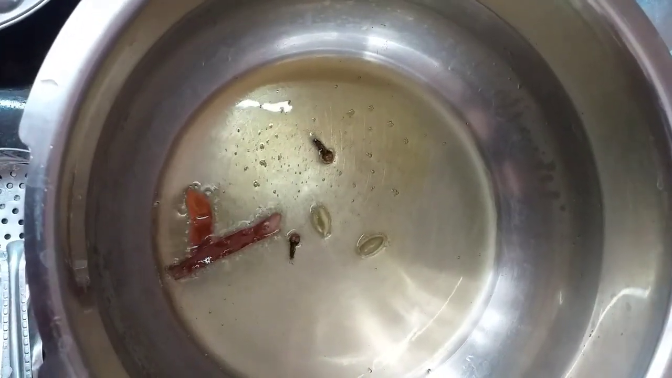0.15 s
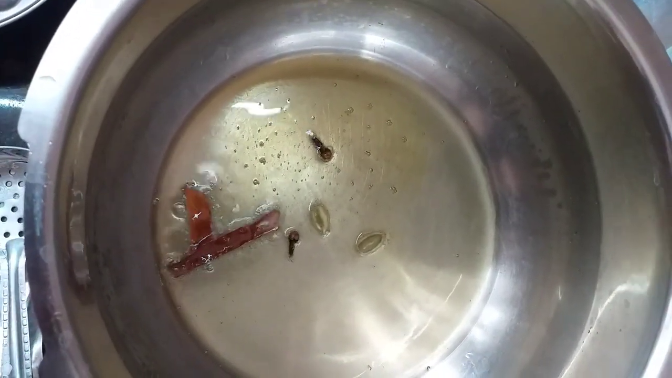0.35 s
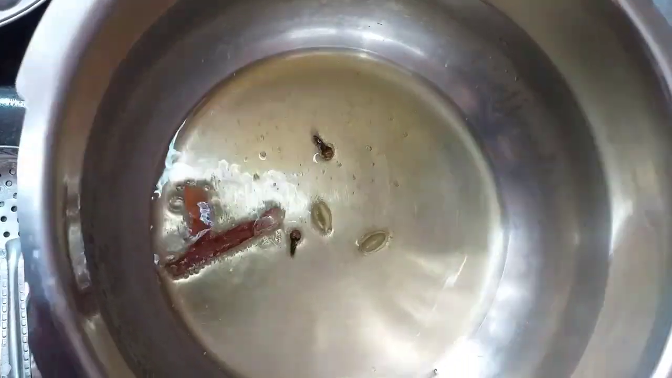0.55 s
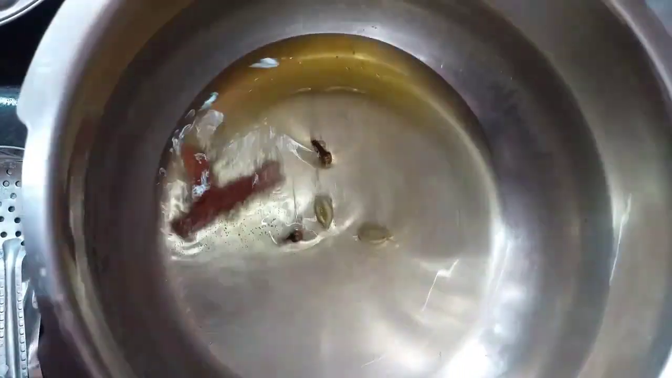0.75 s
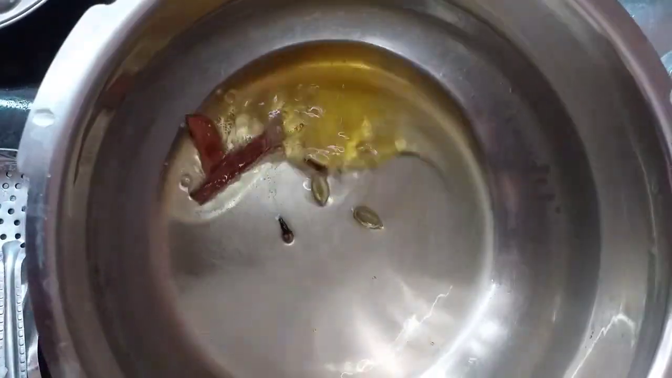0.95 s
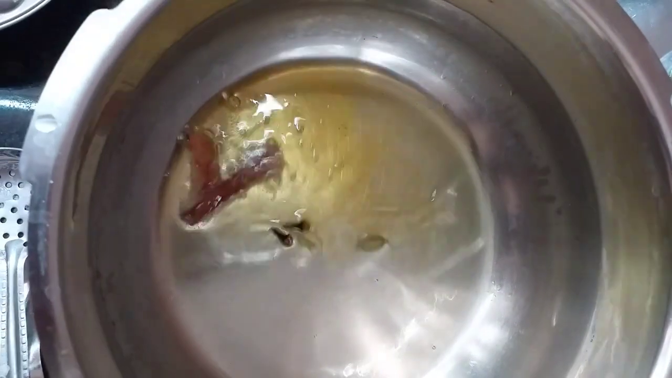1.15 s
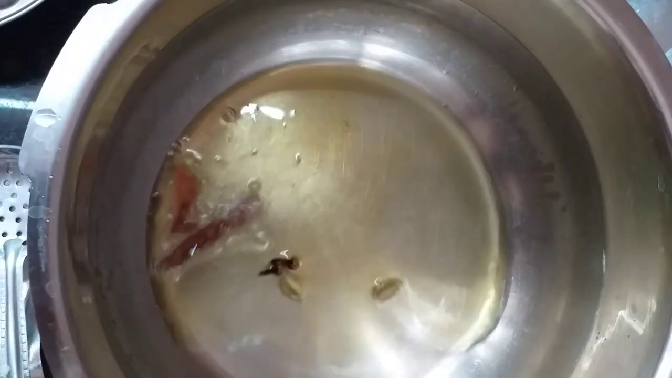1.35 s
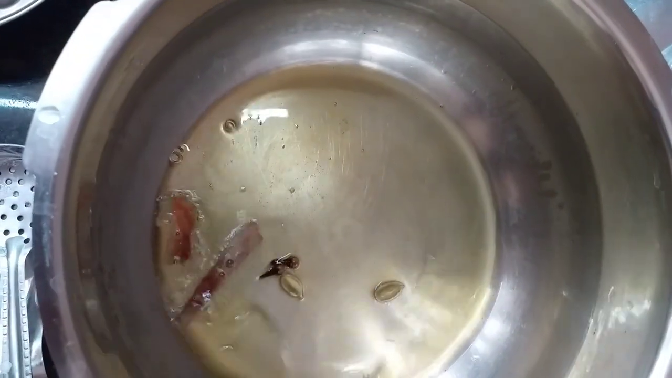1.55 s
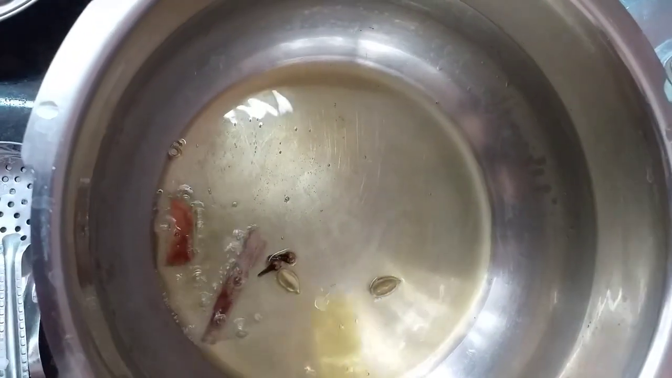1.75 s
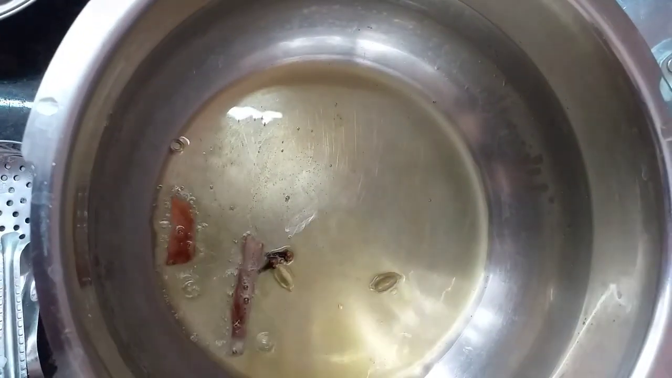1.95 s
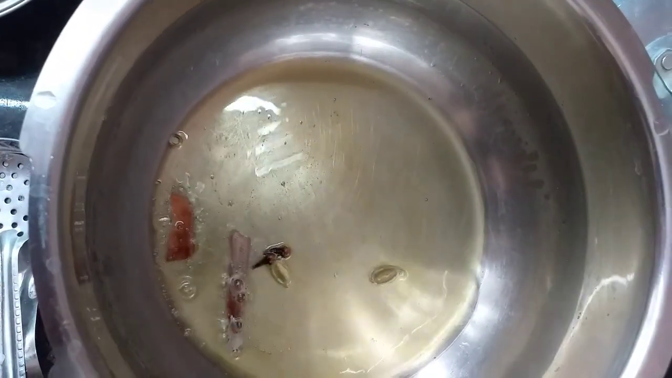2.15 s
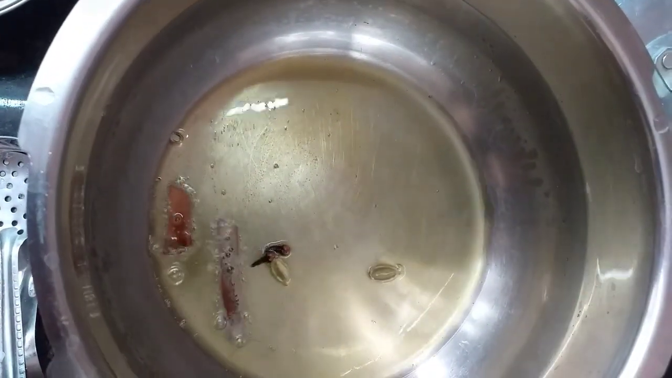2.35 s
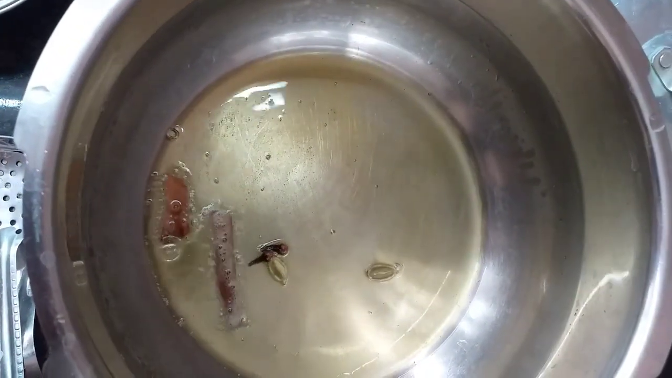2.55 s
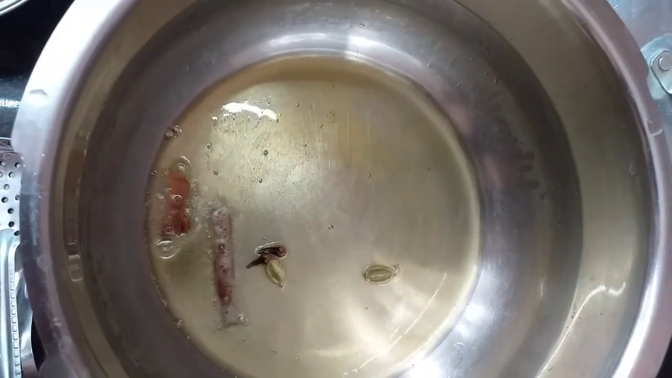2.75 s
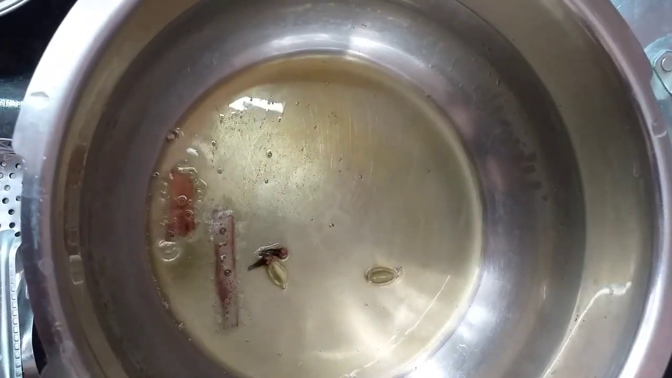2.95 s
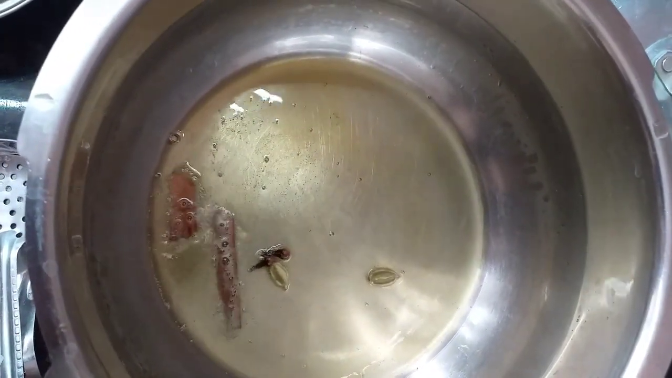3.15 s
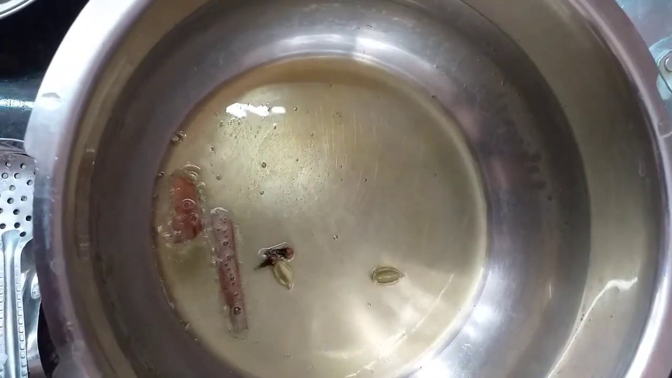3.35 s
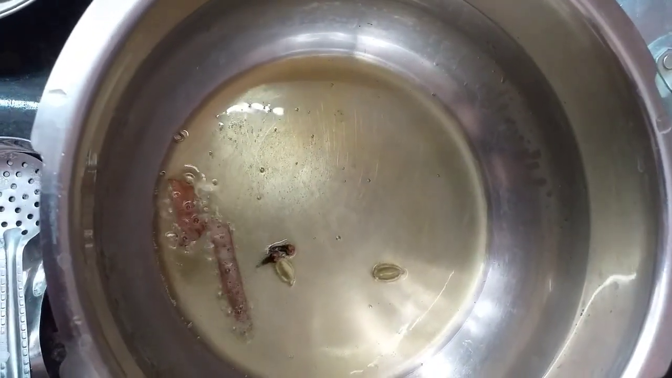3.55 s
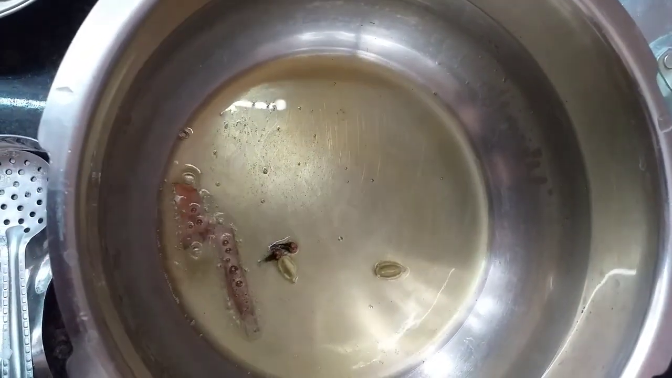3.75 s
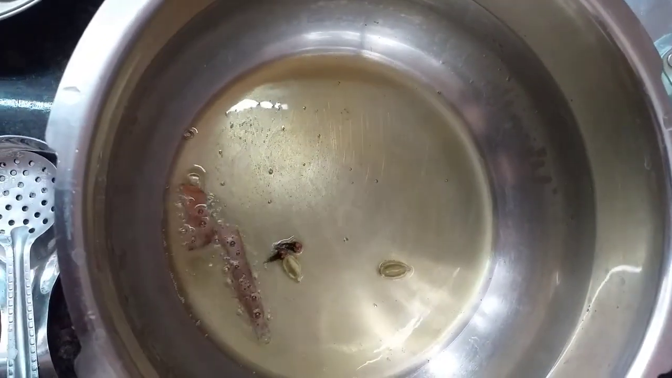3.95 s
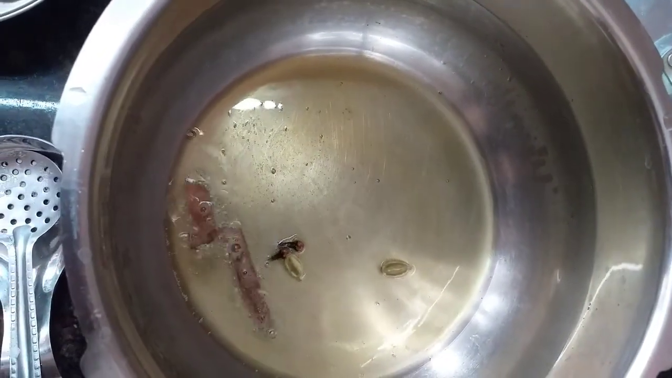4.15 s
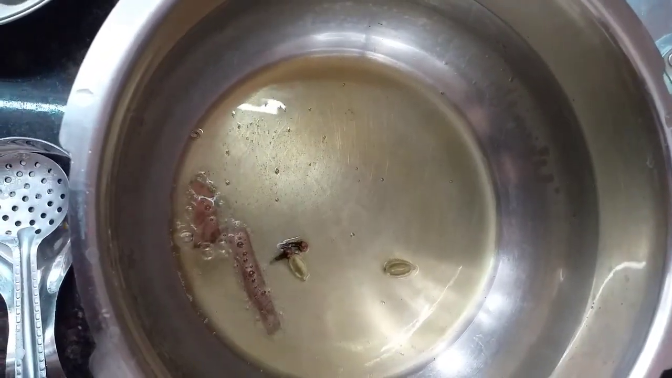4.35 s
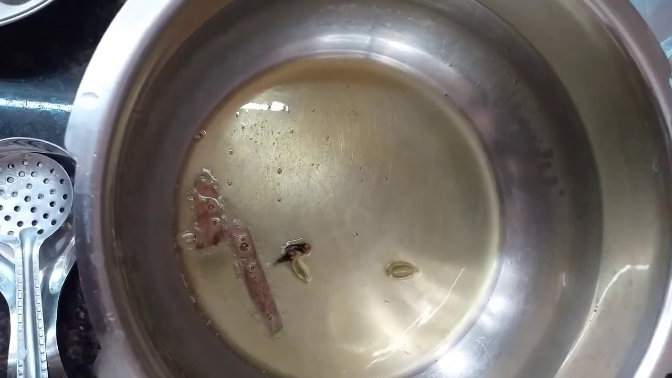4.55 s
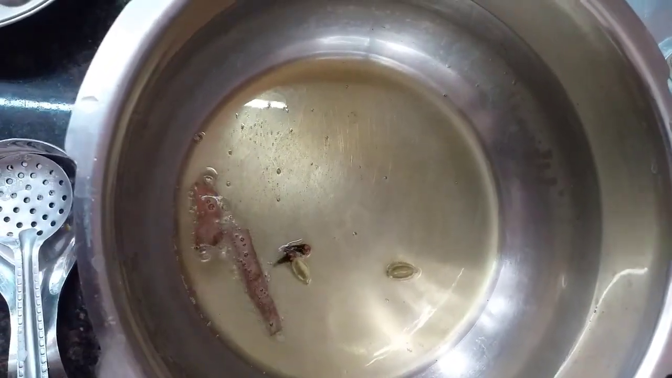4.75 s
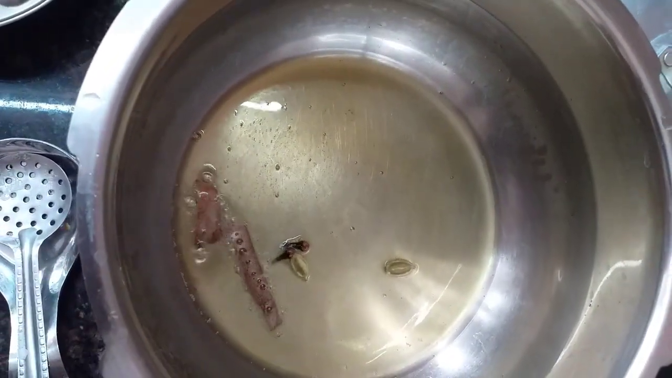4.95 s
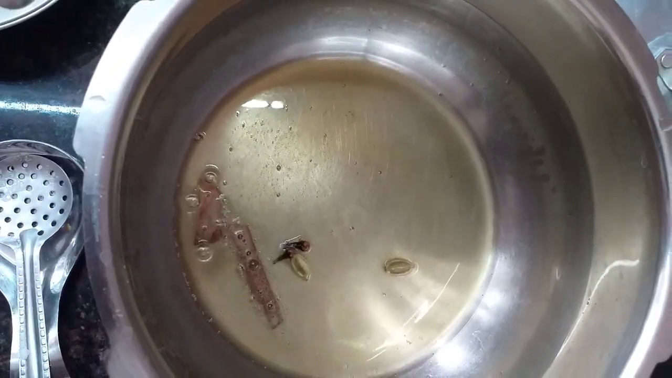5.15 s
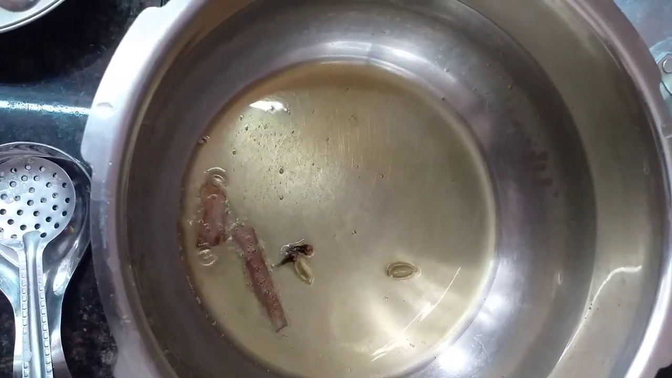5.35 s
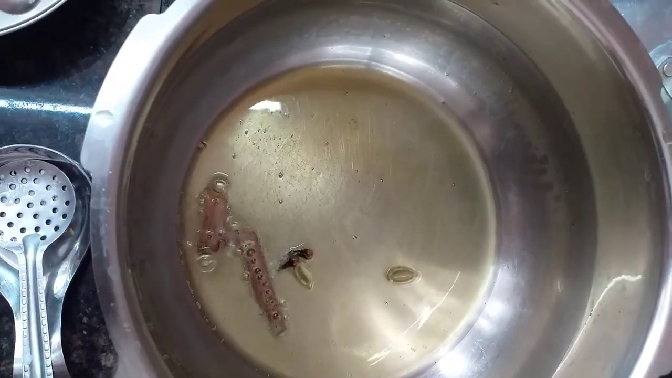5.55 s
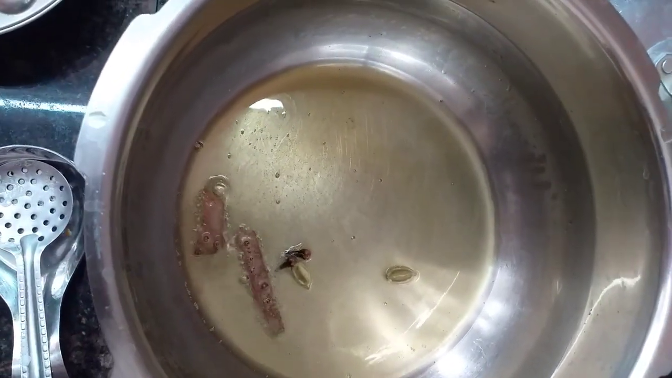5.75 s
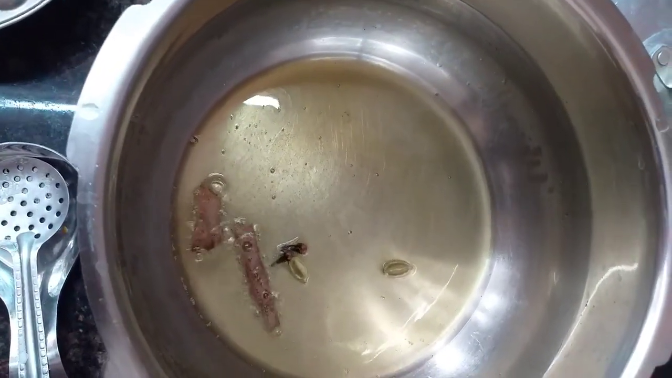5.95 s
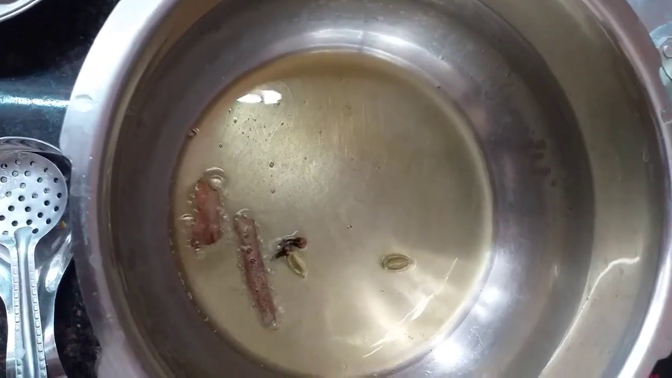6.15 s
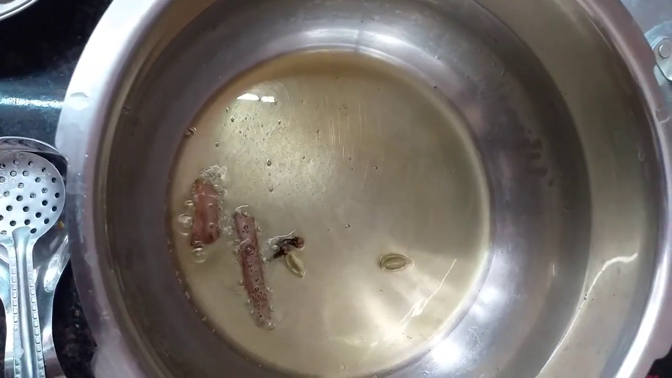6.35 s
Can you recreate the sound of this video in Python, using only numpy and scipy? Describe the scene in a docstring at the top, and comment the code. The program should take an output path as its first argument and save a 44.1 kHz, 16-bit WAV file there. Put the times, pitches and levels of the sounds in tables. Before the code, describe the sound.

Whole spices fry gently in oil in a steel pot, a fine, high sizzle dotted with sharp pops. The pot knocks and rattles on the stove's metal support, loudest about a second in, then gives a few lighter knocks and ticks. The sizzle swells slightly and scattered pops continue. A tap drips steadily throughout, over a faint gas flame hiss and low hum, heard close up in a small kitchen.

```python
"""Whole spices fry gently in oil in a steel pot in a small kitchen. From the start tiny bubbles sizzle,
spices pop and a tap drips steadily, over a gas flame's hiss, a low rumble and an appliance's hum.
The pot is tilted and knocks on its trivet, hardest near 1 s; the microphone's gain dips a moment later.
Lighter knocks and ticks follow until 3 s. The sizzle swells near 2.5 s and again near 6 s;
pops and drips go on to the end."""
import sys
import numpy as np
from scipy import signal
from scipy.fft import rfft, irfft, next_fast_len
from scipy.io import wavfile
from scipy.ndimage import uniform_filter1d

SR = 44100
rng = np.random.default_rng(int(sys.argv[2]) if len(sys.argv) > 2 else 0)


def wav_out(sig):
    """Save sig, one row per channel (or a flat mono array), as 16-bit PCM at SR to the path in sys.argv[1]."""
    wavfile.write(sys.argv[1], SR, np.round(np.clip(np.atleast_2d(sig).T, -1, 1) * 32767).astype(np.int16))


N = 281799


def sizzle():
    """Tiny bubbles at the spices: a treble band and a top hiss, both flickering."""
    # vigour of the frying: t/s, sizzle level/dB, top hiss level/dB
    vigour = [(0, -57.5, -58.5), (0.9, -58, -59.5), (1.3, -54.5, -56), (2.1, -55, -56.5),
              (2.55, -50.5, -55), (3.3, -53, -56), (4.2, -52.5, -56.5), (4.9, -56.5, -57.5),
              (5.75, -56, -58), (6.1, -51.5, -57.5), (6.39, -57, -57)]
    # sizzle spectrum: f/Hz, relative density/dB
    sizzle_spectrum = [(2900, -13.5), (5000, -14), (6340, -10), (7440, -0.5), (7750, -1), (8700, -8.5),
                       (9200, -16.5), (12000, -41), (20000, -120)]
    # top hiss spectrum: f/Hz, relative density/dB
    hiss_spectrum = [(5000, -45), (8500, -1), (9200, -1.5), (10000, 0.5), (12100, 1), (15000, -4),
                     (15800, -2), (15950, -53)]
    sizzle_db, hiss_db = curves(vigour)
    band = amp(sizzle_db + 1.1 * drift(4) + .6 * drift(14)) * bubbles(sizzle_spectrum)
    hiss = amp(hiss_db + .4 * drift(14)) * bubbles(hiss_spectrum)
    return band + hiss


def bubbles(spectrum, rate_per_s=1500, spread_db=4.5, grain_db=-7):
    """Dense uneven bubble clicks on smooth noise; rms 1."""
    sizes = amp(spread_db * np.minimum(rng.exponential(1, N), 5)) * rng.choice([-1, 1], N)
    bursts = rng.random(N) < rate_per_s * amp(3 * drift(5)) / SR
    return coloured(rng.standard_normal(N) + amp(grain_db) * unit_rms(sizes * bursts), spectrum)


def pops(ring_s=0.00077, click_db=-12):
    """Sharp pops, and one bright tap drip near 1.06 s: each a click and two short pitches."""
    # pops and the one drip: t/s, peak level/dB, low f/Hz, high f/Hz, high re low/dB
    events = [(0.0355, -16, 8270, 9700, -6.5), (0.0735, -22.5, 4930, 11400, 8.5),
              (0.283, -44, 6000, 11000, -20), (0.386, -17, 5060, 10500, -33),
              (0.4353, -23.5, 7700, 10900, 1), (0.4697, -20.5, 4900, 11400, 4.5),
              (0.5514, -37, 5030, 11800, 4), (0.634, -30.5, 5200, 7300, 5), (1.0595, -30.5, 7000, 12500, 6),
              (1.697, -25.5, 5800, 14740, 13), (2.3785, -37, 7740, 12500, -18),
              (2.589, -35, 7260, 12400, -11), (3.9516, -28.5, 6150, 11000, 5),
              (4.3393, -34, 7000, 10600, 3), (4.369, -33, 5700, 11200, -21), (4.389, -17, 7360, 9350, -1.5),
              (5.242, -40, 7000, 14600, -19), (5.301, -35, 7400, 12100, -20),
              (5.6945, -34.5, 7200, 13600, 3), (6.1429, -42, 3730, 7000, -1), (6.205, -46, 5000, 7500, -2)]
    faint = rng.uniform([0, -48, 3500, 10000, -20], [N / SR, -40, 8000, 14500, 0], size=(13, 5))
    out, width_hz = np.zeros(N), 1 / (np.pi * ring_s)
    highpass = signal.butter(2, 3500, "high", fs=SR, output="sos")
    for t_s, peak_db, low_hz, high_hz, high_db in [*events, *faint]:
        crack = puff(0.0017, 0.00054, 2000)
        low = unit_peak(resonate(crack, low_hz, width_hz, 8 * width_hz))
        high = unit_peak(resonate(crack, high_hz, 7.5 * width_hz, 7.8 * width_hz))
        click = unit_peak(signal.sosfilt(highpass, puff(0.0044, 0.00085, 2000)))
        add(out, t_s, amp(peak_db) * unit_peak(low + amp(high_db) * high + amp(click_db) * click))
    return out


def pot_knocks(rattle_db=-1.1, top_re_rim_db=-6.5, lowpass_hz=8800):
    """A short rough contact rings the pot and rattles the trivet. Returns direct sound and room feed."""
    # pot on trivet: t/s, band level/dB (boom, base, wall, rim), contact/s, t60 factor, room send/dB
    blows = [(0.3858, -30, -19, -32, -20.5, 0.0034, 0.35, -3),
             (0.928, -39, -23, -17, -1.5, 0.0062, 0.44, -3.5),
             (0.996, -33, -19.5, -23.5, -36, 0.0018, 0.16, 1),
             (1.007, -29.5, -28, -20, -16, 0.00313, 1.0, -4.5),
             (1.11, -32, -37, -43, -28.5, 0.0015, 0.9, -9), (1.343, -43, -49, -62, -37.5, 0.004, 0.69, -3),
             (1.409, -77, -75, -68, -46, 0.0058, 2.1, 8.5), (2.022, -70, -70, -48, -32.5, 0.0016, 0.4, -18),
             (2.198, -70, -70, -37, -33, 0.0015, 0.5, -7),
             (2.995, -46, -41.5, -39, -35.5, 0.011, 1.15, 0.5)]
    # steel pot modes: f/Hz, relative level/dB, t60/s
    pot_modes = [(160, -1, .15), (235, 0, .15), (340, -9, .15), (506, -1, .15), (653, -6, .22),
                 (797, 0, .2), (921, -2, .2), (1055, -5, .2), (1500, -3, .1), (1610, 0, .15),
                 (1760, -1, .15), (1976, -8, .15), (2444, 1, .17), (2875, 3, .12), (3400, 1, .1),
                 (3466, -1, .12), (3580, 0, .12), (4059, 0, .15), (4273, 0, .15), (4326, -2, .15),
                 (4571, -1, .15), (4614, -1, .15), (5003, -2, .12), (5210, -1, .15), (5560, 0, .3),
                 (5927, -6, .08), (6744, -3, .08), (6980, -2, .08), (7670, 1, .12)]
    # trivet rattle, one row a band: f/Hz, width/Hz
    trivet = [(240, 300), (750, 520), (1700, 1200), (4200, 2400), (7300, 1800)]
    edges_hz = [100, 450, 1200, 2800, 5800, 8300]
    direct, room_feed = np.zeros((2, N))
    for t_s, boom_db, base_db, wall_db, rim_db, contact_s, sustain, room_db in blows:
        bands_db = boom_db, base_db, wall_db, rim_db, rim_db + top_re_rim_db
        rise_s = 0.8 * contact_s
        contact = puff(0.39 * contact_s, rise_s, SR // 3)
        blow = 0
        for low_hz, high_hz, band_db, (rattle_hz, width_hz) in zip(
                edges_hz, edges_hz[1:], bands_db, trivet):
            ring = 0
            for f_hz, mode_db, t60_s in pot_modes:
                if low_hz <= f_hz < high_hz:
                    mode_width_hz = np.log(1000) / np.pi / (sustain * t60_s)
                    gain = amp(mode_db + rng.normal(0, 0.98))
                    ring += gain * unit_rms(resonate(contact, f_hz, mode_width_hz))
            shaking = puff(1.4 * contact_s, rise_s, SR // 3)
            rattle = resonate(shaking, rattle_hz, width_hz, width_hz)
            blow += amp(band_db) * unit_peak(unit_rms(ring) + amp(rattle_db) * unit_rms(rattle))
        blow = signal.lfilter(*signal.butter(1, lowpass_hz, fs=SR), blow)
        add(direct, t_s, blow)
        add(room_feed, t_s, amp(room_db) * blow)
    return direct, room_feed


def tap_drips(ring_s=0.004, splash_s=0.0077):
    """Each drop sets a bubble ringing unsteadily; the splash is a short hiss."""
    # drops: t/s, plink level/dB, plink f/Hz, splash level/dB, splash f/Hz
    drops = [(0.2434, -39.5, 3440, -35.5, 7700), (0.6552, -46, 2900, -35, 4300),
             (1.48, -40.5, 2996, -33.5, 6040), (1.887, -40.5, 2380, -36, 5770),
             (2.2988, -38, 2340, -37.5, 3430), (2.7134, -47, 2750, -34, 4140),
             (3.1308, -40, 2380, -39, 4900), (3.5464, -43, 2350, -49, 7330),
             (3.9529, -45, 2690, -32.5, 6460), (4.366, -40, 2310, -40, 6900),
             (4.7785, -39, 2250, -36.5, 7400), (5.1948, -43, 1920, -35.5, 7000),
             (5.601, -37.5, 2305, -33.5, 4870), (6.012, -42, 2240, -33.5, 7060)]
    out, width_hz = np.zeros(N), 1 / (np.pi * ring_s)
    for t_s, plink_db, plink_hz, splash_db, splash_hz in drops:
        plink = resonate(puff(0.0016, 0.0043, 3000), plink_hz, width_hz, 22 * width_hz)
        splash = resonate(puff(splash_s, 0.0026, 3000), splash_hz, 0.17 * splash_hz, 1.5 * splash_hz)
        add(out, t_s, amp(plink_db) * unit_peak(plink) + amp(splash_db) * unit_peak(splash))
    return out


def gas_flame(level_db=-53.5, flicker_db=1.57):
    """Burning gas: a broad, flickering hiss."""
    # flame spectrum: f/Hz, relative density/dB
    spectrum = [(240, -36), (400, -5.5), (608, -7), (946, -2), (1120, -5.5), (1380, -5), (2000, -10.5),
                (2290, -11.5), (2680, -11), (6000, -11.5), (7800, -7), (13200, -120)]
    return amp(level_db + flicker_db * drift(6.7)) * coloured(rng.standard_normal(N), spectrum)


def hum_and_boom(hum_hz=98.6, waver_hz=1.153, throb_hz=3.15, throb_depth=0.6, dip_at_s=0.3):
    """Throbbing low hum with its octave, plus the pot's low boom just after the knocks at 0.4 s and 1 s."""
    # low hum, with the pot's boom at 0.45 s and 1.05 s: t/s, level/dB
    low_level = [(0, -55), (0.36, -63.5), (0.45, -48.5), (0.65, -63), (0.95, -61), (1.05, -53),
                 (1.4, -60.5), (1.6, -61), (2.9, -56.5), (3.3, -66.5), (3.7, -55.5), (4.0, -66),
                 (4.35, -51), (4.66, -65), (5.0, -60), (6.39, -64)]
    # octave: t/s, level/dB
    octave_level = [(0, -77), (4.1, -75), (4.22, -57), (4.5, -64.5), (4.65, -92), (4.9, -68), (5.0, -68),
                    (5.45, -62.5), (5.6, -72), (6.39, -78)]
    (low_db,), (octave_db,) = curves(low_level), curves(octave_level)
    throb = 1 - throb_depth * np.cos(2 * np.pi * throb_hz * (np.arange(N) / SR - dip_at_s))
    phase = 2 * np.pi * np.cumsum(hum_hz + waver_hz * drift(3.84)) / SR
    low = amp(low_db) * throb * np.sin(phase)
    return np.sqrt(2) * (low + amp(octave_db) * np.sin(2 * phase))


def rumble():
    """Low noise that swells near 4.2 s."""
    # rumble spectrum: f/Hz, relative density/dB
    spectrum = [(30, -58), (45, -30), (75, -11), (120, -1), (160, -3), (210, -11), (280, -4), (500, -15.5),
                (650, -49), (1100, -98)]
    # rumble envelope: t/s, level/dB
    envelope = [(0, -61), (0.78, -60), (1.15, -60), (1.5, -59.5), (3.4, -60), (4.2, -53.5), (4.6, -58.5),
                (5.36, -58), (5.6, -60.5), (6.39, -62)]
    level_db, = curves(envelope)
    return amp(level_db + .5 * drift(3.2)) * coloured(rng.standard_normal(N), spectrum)


def faint_tones():
    """Narrow noise bands: wavering tones and resonances in the hiss."""
    # noise bands: f/Hz, width/Hz, level/dB
    bands = [(947, 15, -65.5), (56.5, 11, -72), (2317, 38, -73), (3600, 110, -69), (4314, 240, -69),
             (5110, 360, -66)]
    return sum(amp(level_db) * unit_rms(resonate(rng.standard_normal(N), f_hz, width_hz, width_hz))
               for f_hz, width_hz, level_db in bands)


def kitchen_reverb(x, gap_s=.002, rise_s=0.00083):
    """Dense reflections after a short gap, each band dying at its own rate."""
    # room decay: f/Hz, t60/s
    decay = [(100, 0.4), (500, 0.66), (1500, 0.47), (4000, 0.32), (8000, 0.17), (16000, 0.23)]
    t_s, tail = np.arange(SR) / SR, 0
    edges_hz = np.geomspace(60, 16500, num=13)
    for low_hz, high_hz in zip(edges_hz, edges_hz[1:]):
        bandpass = signal.butter(2, [low_hz, high_hz], "band", fs=SR, output="sos")
        t60_s = at_hz(decay, np.sqrt(low_hz * high_hz))
        tail += signal.sosfilt(bandpass, rng.standard_normal(SR)) * amp(-60 * t_s / t60_s)
    tail *= np.clip((t_s - gap_s) / rise_s, 0, 1)
    return signal.fftconvolve(x, tail / np.sqrt(np.sum(tail ** 2)))[:N]


def amp(level_db):
    """dB to gain."""
    return 10 ** (np.asarray(level_db) / 20)


def unit_rms(x):
    """Scale to rms 1."""
    return x / np.sqrt(np.mean(x ** 2) + 1e-20)


def unit_peak(x):
    """Scale to peak 1."""
    return x / np.max(np.abs(x))


def curves(rows):
    """Columns after t/s, interpolated to one value a sample."""
    t_s, *columns = np.transpose(rows)
    return [np.interp(np.arange(N) / SR, t_s, column) for column in columns]


def at_hz(rows, f_hz):
    """Table lookup on a log-frequency axis."""
    knots_hz, values = np.transpose(rows)
    return np.interp(np.log(f_hz + 1), np.log(knots_hz), values)


def drift(corner_hz):
    """Slow low-passed noise; rms about 1."""
    hop = 40
    pole = np.exp(-2 * np.pi * corner_hz * hop / SR)
    noise = rng.standard_normal(N // hop + 2002)
    slow = signal.lfilter([1], [1, -2 * pole, pole * pole], noise)[2000:]
    return np.interp(np.arange(N) / hop, np.arange(len(slow)), unit_rms(slow))


def resonate(x, f_hz, *widths_hz):
    """Two-pole resonators in series, one per width; peak gain 1."""
    for width_hz in widths_hz:
        r = np.exp(-np.pi * width_hz / SR)
        feedback = [1, -2 * r * np.cos(2 * np.pi * f_hz / SR), r * r]
        x = signal.lfilter((1 - r * r) / 2 * np.array([1, 0, -1]), feedback, x)
    return x


def coloured(x, spectrum):
    """Shape by a spectrum; rms 1."""
    size = next_fast_len(N)
    gain = amp(at_hz(spectrum, np.arange(size // 2 + 1) * SR / size))
    return unit_rms(irfft(rfft(x, size) * gain, size)[:N])


def puff(decay_s, rise_s, samples):
    """Noise burst: linear rise times exponential decay."""
    t_s = np.arange(samples) / SR
    return rng.standard_normal(samples) * np.exp(-t_s / decay_s) * np.minimum(t_s / rise_s, 1) + 1e-18


def add(track, t_s, sound):
    """Mix a sound in at t_s."""
    start = round(t_s * SR)
    track[start:start + len(sound)] += sound[:N - start]


def scene():
    """All sources at one microphone; knocks, pops and drips also arrive off the walls."""
    (pot, pot_room_feed), popping, tap = pot_knocks(), pops(), tap_drips()
    walls = kitchen_reverb(pot_room_feed + amp(-2.2) * popping + amp(-1) * tap)
    bed = rumble() + gas_flame() + sizzle() + hum_and_boom() + faint_tones()
    mono = pot + popping + amp(-3.5) * tap + walls + bed
    return np.array([mono, mono])


def record(dry, limit_db=-7.5, release_db_per_s=92.0, lag_s=0.008, cutoff_hz=16500):
    """Housing notch, soft clip, a gain that drops just after a loud peak and recovers, then low-pass."""
    # microphone housing notch: f/Hz, width/Hz, depth (0-1)
    notch = (8870, 3630, 0.59)
    notch_hz, width_hz, depth = notch
    notched = dry - depth * resonate(dry, notch_hz, width_hz)
    over_db = np.maximum(20 * np.log10(np.abs(notched[0]) + 1e-9) - limit_db, 0)
    release_db = release_db_per_s * np.arange(N) / SR
    held_db = np.maximum.accumulate(over_db + release_db) - release_db
    reduction_db = np.interp(np.arange(N) - lag_s * SR, np.arange(N), held_db)
    limited = np.tanh(notched) * amp(-uniform_filter1d(reduction_db, size=20))
    return signal.sosfilt(signal.ellip(10, .5, 60, cutoff_hz, fs=SR, output="sos"), limited)


dry = scene()
out = record(dry)
wav_out(out)
```